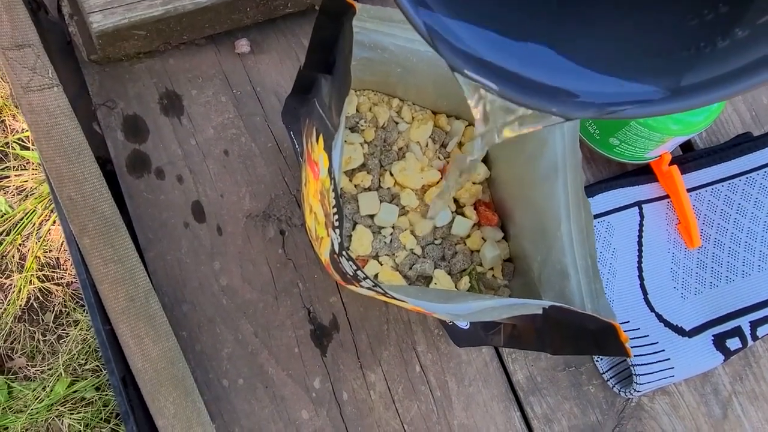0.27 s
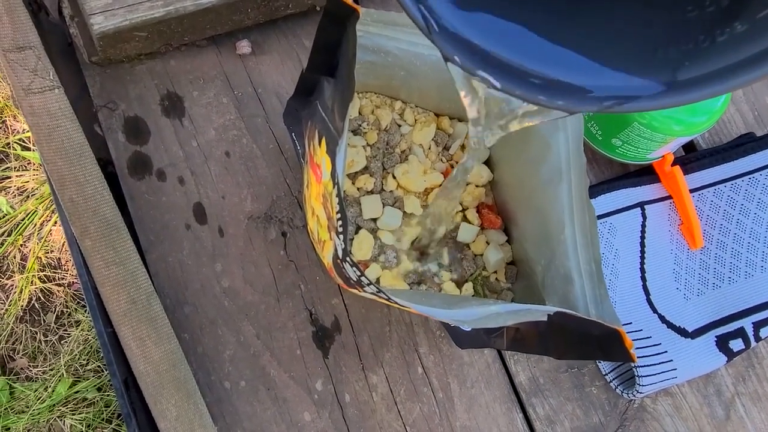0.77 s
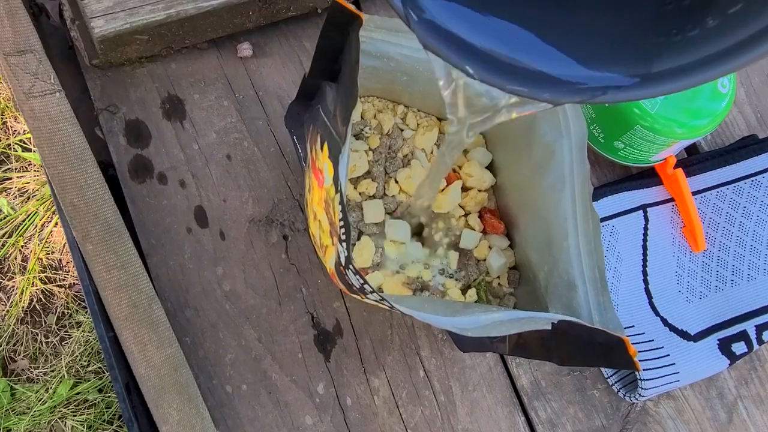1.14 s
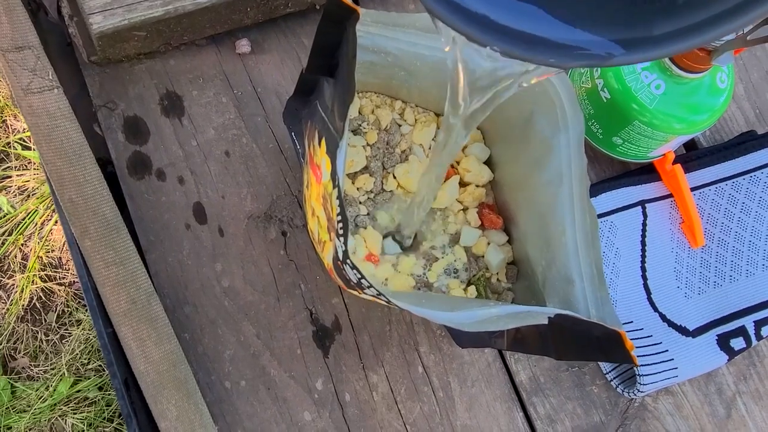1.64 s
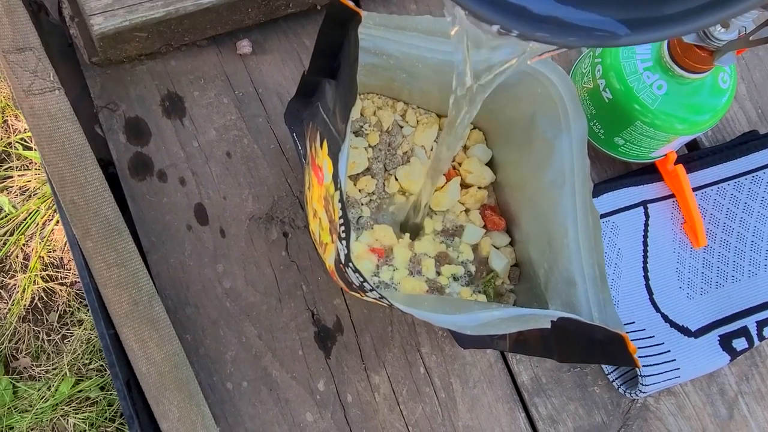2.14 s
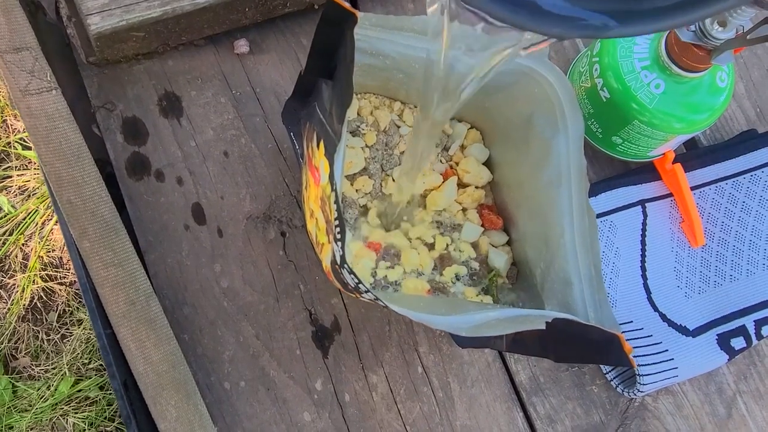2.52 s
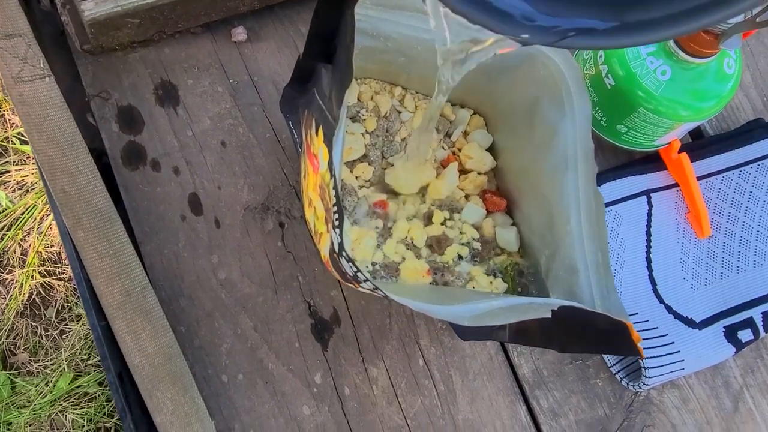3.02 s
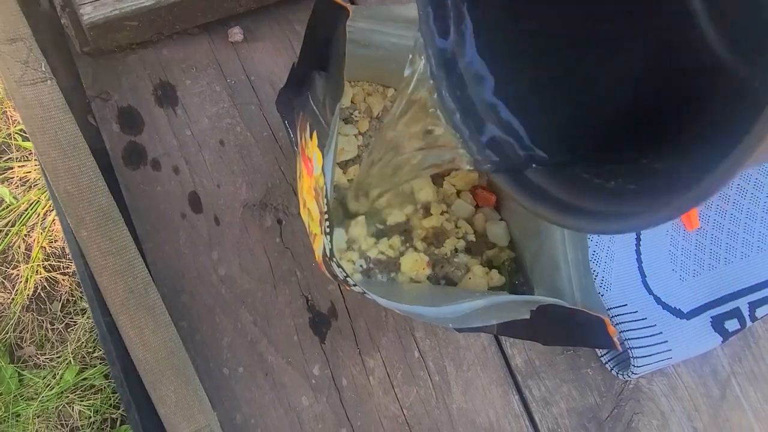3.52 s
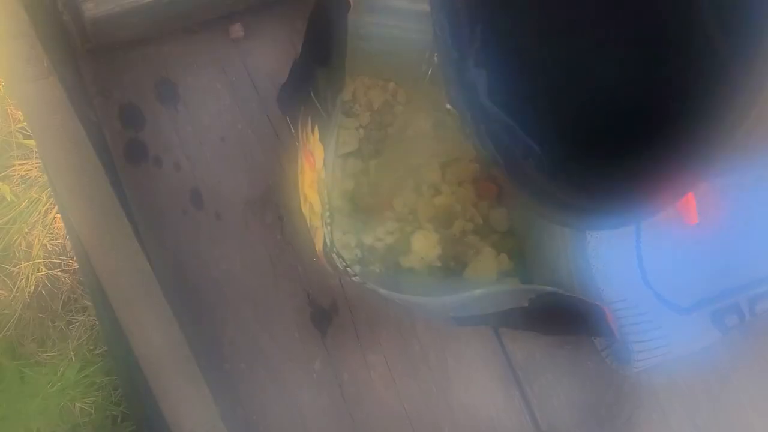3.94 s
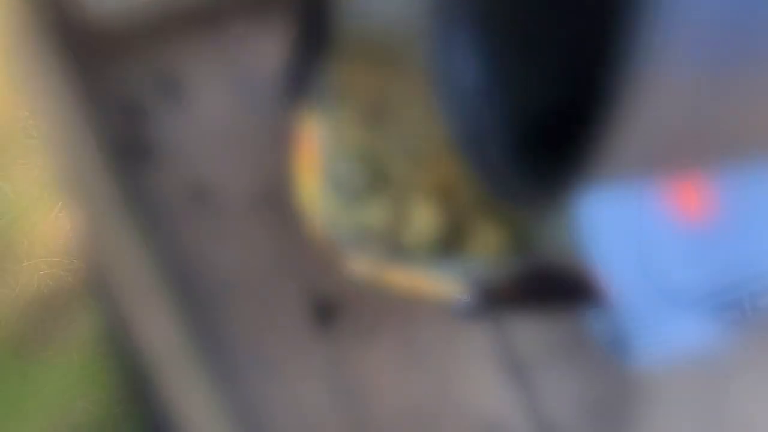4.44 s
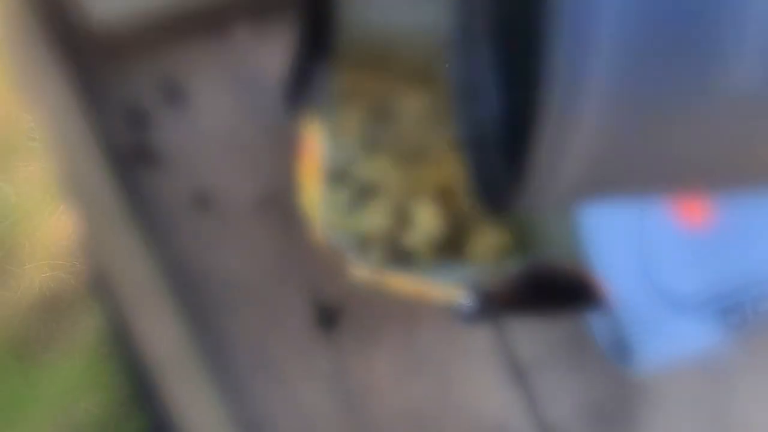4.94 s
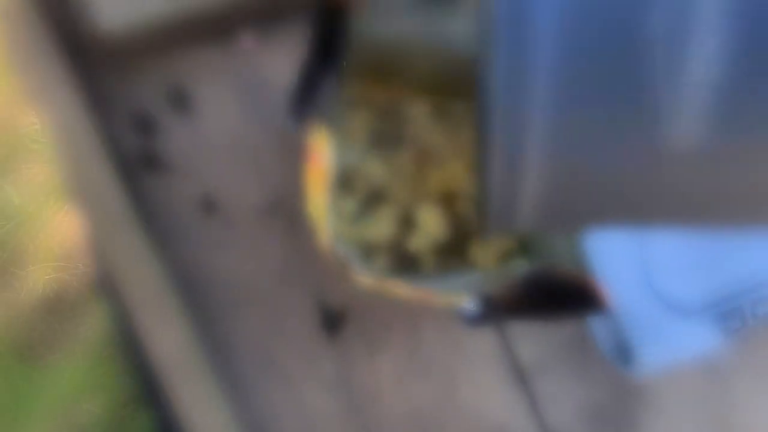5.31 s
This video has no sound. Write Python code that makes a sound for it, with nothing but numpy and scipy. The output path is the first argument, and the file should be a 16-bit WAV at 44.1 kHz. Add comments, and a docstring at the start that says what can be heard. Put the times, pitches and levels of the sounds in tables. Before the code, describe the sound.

Close, dry stereo outdoors on a wooden deck, with gusty deep rumble, faint air and a hollow, slowly sinking drone throughout. A soft low bloop comes first; at about 0.2 s water reaches the hot pot rim and a thin, bright sizzle starts. From 0.5 s separate wet splats and pattering land on dried food, with sharp metallic spits, densest between 0.7 and 1.3 s. The sizzle turns from coarse crackle to finer fizz as the pot tips, while round low bloops cluster around 1.5-1.9 s. Through 2-3 s the rustling becomes wetter and fuller, with small bubbles and drops tapping foil. Around 3.3-3.6 s a surge and a rising swish slide along the pouch. Sharp, damped foil snaps erupt at 3.7-4.0 s, strongest near 3.8, with small ones until 4.2. The pour then thins; from 4.95 s quick, nearly even drips patter to the end over light fizz.

```python
"""Boiling water is poured from a camp pot into a foil pouch of dried food: filtered clicks and ringing bubbles.
It spatters and rustles over the food, with separate splats, drops on the foil and a rising swish.
The hot pot wall sizzles and spits: clicks coloured by its ring, which shifts as the pot tips.
The pouch crackles in sharp damped snaps; low bloops come and go.
Behind it, on a wooden deck outdoors: a low rumble with gusts, faint air and a sinking hollow drone."""
import sys
import numpy as np
from scipy import signal
from scipy.fft import rfft, irfft
from scipy.io import wavfile
from scipy.ndimage import uniform_filter1d

SR = 44100
rng = np.random.default_rng(int(sys.argv[2]) if len(sys.argv) > 2 else 0)


def to_wav(sig):
    """Store sig (one row per channel, or 1-D mono) as 16-bit WAV at the path in sys.argv[1].

    Samples outside -1..1 are clipped; the rate is SR.
    """
    pcm = np.clip(np.atleast_2d(sig), -1, 1) * 32767
    pcm = np.round(pcm).astype(np.int16)
    wavfile.write(sys.argv[1], SR, pcm.T)  # frames by channels


N = 245416
TIME = np.arange(N) / SR
FREQ = np.fft.rfftfreq(N, 1 / SR)
FIRST_DROP_S = 0.225  # the water reaches the hot rim

# Colour of water landing on the food. Each row: frequency in Hz, relative level in dB.
SPLASH_SPECTRUM = [(400, -28.5), (650, 2), (780, -29), (880, 7.5), (1120, 5.5), (1420, -4), (1850, -1.5),
                   (2100, -50), (2350, -23), (2650, -13), (5000, -16.5), (9000, -26)]


def amp(db):
    """Decibels to gain."""
    return 10 ** (np.asarray(db) / 20)


def unit(x):
    """Scales to an rms of one."""
    return x / np.sqrt(np.mean(x ** 2) + 1e-20)


def curves(table):
    """Each column of a table over time."""
    s, *columns = np.transpose(table)
    return [np.interp(TIME, s, c) for c in columns]


def spectra(table, hz):
    """Each column of a table over log frequency."""
    f, *columns = np.transpose(table)
    return [np.interp(np.log(hz + 1), np.log(f + 1), c) for c in columns]


def swells(table):
    """Rise in dB over time: one smooth hump for each row."""
    rise_db = 0
    for s, length_s, db in table:
        phase = np.pi * np.clip((TIME - s) / length_s, -.5, .5)
        rise_db = rise_db + db * np.cos(phase) ** 2
    return rise_db


def add(mix, s, sound):
    """Mixes a sound in at time s."""
    part = mix[:, max(round(s * SR), 0):][:, :sound.shape[1]]
    part += sound[:, :part.shape[1]]


def colour(x, spectrum, size=4096):
    """Causal minimum-phase filter: a click rings after its onset, never before."""
    log_gain = np.log(amp(spectra(spectrum, abs(np.fft.fftfreq(size, 1 / SR)))[0]))
    ring = np.fft.ifft(np.exp(np.conj(signal.hilbert(log_gain)))).real
    return signal.fftconvolve(x, ring[None, :size // 2], axes=1)[:, :x.shape[1]]


def noise(spectrum):
    """Two unrelated noises of one colour."""
    gain = amp(spectra(spectrum, FREQ)[0])
    return unit(irfft(rfft(rng.standard_normal((2, N))) * gain, N))


def band(x, low_hz, high_hz):
    """The part of a sound between two frequencies."""
    low_cut = 1 + (low_hz / (FREQ + 1)) ** 24
    high_cut = 1 + (FREQ / high_hz) ** 24
    return irfft(rfft(x) / low_cut / high_cut, N)


def steady(x, window_s):
    """Evens out swells slower than the window."""
    power = abs(uniform_filter1d(x ** 2, int(window_s * SR), axis=1))
    return x / np.sqrt(power + 1e-9)


def resonate(x, hz, width_hz):
    """A resonance that follows the curve hz."""
    turn = np.exp(2j * np.pi * np.cumsum(hz) / SR)
    r = np.exp(-np.pi * width_hz / SR)
    return 2 * (turn * signal.lfilter([1 - r], [1, -r], x / turn)).real


def grains(per_s, spread_db, clump_db, clump_s):
    """Clumped tiny clicks of uneven size; the second row has the same clicks with independent signs."""
    clumps = unit(uniform_filter1d(rng.standard_normal(N), max(int(clump_s * SR), 1)))
    size_db = spread_db * np.minimum(rng.exponential(1, N), 4) + clump_db * np.minimum(clumps, 2)
    births = rng.random(N) < per_s / SR
    return unit(amp(size_db) * births * rng.choice([-1, 1], (2, N)))


def bubbles(low_hz, high_hz, per_s, cycles, spread_db, count=24, size=2048):
    """Bubbles of mixed sizes: each rings for a few cycles at its own pitch and rises a little."""
    out, t = np.zeros((2, N)), np.arange(size) / SR
    for hz in np.geomspace(low_hz, high_hz, count):
        ring = np.sin(2 * np.pi * hz * t * (1 + 3 * t)) * np.exp(-t * hz / cycles)
        sizes = amp(spread_db * np.minimum(rng.exponential(1, N), 3))
        births = (rng.random(N) < per_s / count / SR) * sizes * rng.choice([-1, 1], (2, N))
        out += signal.oaconvolve(births, ring[None], axes=1)[:, :N]
    return unit(out)


def mottle(x, patchy_db, width_hz, length_s):
    """Every cluster of bubbles has its own pitches: short random spectral patches stand out or drop away."""
    z = signal.stft(x, nperseg=512, noverlap=384)[2]
    field = rng.standard_normal(z.shape[:0:-1])  # frames by bins
    for axis, span in enumerate([length_s * SR / 128, width_hz * 512 / SR]):
        kernel = np.exp(-(2 * np.arange(-16, 17) / span) ** 2)
        field = signal.fftconvolve(field, np.expand_dims(kernel, 1 - axis), "same")
    gain = unit(amp(patchy_db * np.minimum(unit(field), 2)))
    return signal.istft(z * gain.T, nperseg=512, noverlap=384)[1][:, :N]


def scatter(x, wet_db, decay_s, size=4096):
    """Dense little reflections between pot, pouch and deck: a decaying noise tail."""
    t = np.arange(size) / SR
    tail = rng.standard_normal((2, size)) * np.exp(-t / decay_s) * (t > .0007)
    return x + amp(wet_db) * signal.fftconvolve(x, tail / np.linalg.norm(tail[0]), axes=1)[:, :N]


def ports(x):
    """Turns a common and an unrelated row into left and right, keeping the spectrum of their mean."""
    # Two microphone ports. Each row: frequency in Hz, likeness 0-1, left-right in dB, left lead in radians.
    port_rows = [(29.7, 0.96, 11, 0.5), (79.5, 1, 4, 0.5), (152, 0.97, 2.5, 0.5), (357, 0.9, 1, 0.49),
                 (646, 0.99, 1, 0.94), (1110, 0.7, 4.5, 0.92), (1660, 1, 2, 1.5), (2650, 0.36, 0, 1.8),
                 (3280, 0.55, 3.5, 4), (5230, 0.8, 3.5, 4.5), (6400, 0.47, 5, 6), (6760, 0.53, 9.5, 5.5),
                 (8700, 0.92, 0.5, 5.5), (12300, 0.77, 0.5, 6.5), (15700, 0.76, 4, 7.5)]
    same, balance_db, lead = spectra(port_rows, FREQ)
    same = np.clip(same, 0, .995)
    left, right = amp(balance_db / 2), amp(-balance_db / 2)
    common, other = rfft(x)
    right_mix = same * common + np.sqrt(1 - same ** 2) * other
    pair = np.array([left * common, right * np.exp(-1j * lead) * right_mix])
    mean_gain = np.sqrt(left ** 2 + right ** 2 + 2 * same * np.cos(lead))
    return irfft(2 * pair / mean_gain, N)


def stages():
    """Weights of the three pot positions over time; their powers sum to one."""
    # Pot tip. Each row: time in seconds, stage (0 upright, 1 tilted, 2 tipped over the pouch).
    tip_rows = [(1.3, 0.1), (1.4, 1.11), (3.02, 1.19), (3.3, 2.2)]
    tip = np.clip(curves(tip_rows)[0], 0, 2)
    return np.sqrt(np.maximum(1 - abs(tip - np.array([[0], [1], [2]])), 0))


def flowing():
    """Fades from nothing to one as the first water arrives."""
    return np.clip((TIME - FIRST_DROP_S) / 0.033, 0, 1)


def background():
    """Deep outdoor rumble with gusts, faint air, and a hollow drone of noise and a sinking resonance."""
    # Spectra. Each row: frequency in Hz, relative level in dB.
    rumble_spectrum = [(8, -59), (18, -4.5), (26, -2.5), (33, 1.5), (42, 5.5), (53, -5), (68, -11),
                       (110, -16), (138, -27.5), (200, -34), (350, -37), (800, -70), (4000, -100)]
    air_spectrum = [(300, 6), (700, 0), (880, -7), (1100, -6.5), (1600, -8.5), (2250, -16), (3000, -17),
                    (6000, -44), (8050, -73), (11200, -29), (16000, -22)]
    open_spectrum = [(120, -7.5), (200, -23), (245, -3.5), (295, 3), (345, -7.5), (405, 2.5), (470, -9.5),
                     (560, -22.5), (720, -35.5), (2000, -40), (7000, -48)]
    covered_spectrum = [(120, -41), (195, -8), (245, 5), (305, -4), (360, -12), (430, -12), (520, -31),
                        (720, -22), (2000, -88)]  # the pot covers the pouch
    # Drone level. Each row: time in seconds, level in dB.
    drone_level = [(0, -37), (.3, -46), (.95, -41), (1.3, -43), (1.55, -34.5), (1.85, -35.5), (2.05, -40.5),
                   (2.7, -43), (3.0, -41), (3.45, -38.5), (3.7, -39.5), (4.45, -39), (4.7, -37.5),
                   (5.08, -43.5), (5.3, -38)]
    # Gusts lifting the rumble. Each row: top in seconds, length in seconds, rise in dB.
    gusts = [(.67, 0.28, 5.5), (.95, 0.1, 4.5), (1.53, 0.25, 5), (1.82, 0.059, 11), (2.66, 0.12, 6.5),
             (3.24, 0.25, 8), (3.42, 0.14, 5.5), (4.61, 0.1, 6.5), (4.95, 0.36, 7.5), (5.27, 0.16, 6.5)]
    start_hz, end_hz, sink_s = 341, 284.3, 2.67
    rumble_db, freshen_db_per_s = -31.5, 0.76  # the breeze between gusts freshens slowly

    centre_hz = end_hz + (start_hz - end_hz) * np.exp(-TIME / sink_s)
    upright, tilted, covered = stages()
    broad = np.hypot(upright, tilted) * noise(open_spectrum) + covered * noise(covered_spectrum)
    hum = resonate(rng.standard_normal((2, N)), centre_hz, width_hz=85)
    hum = resonate(hum, centre_hz, width_hz=75)
    drone = steady(broad + .5 * unit(hum), 0.12) * amp(curves(drone_level)[0])
    level_db = rumble_db + freshen_db_per_s * TIME + swells(gusts)
    rumble = steady(noise(rumble_spectrum), 0.131) * amp(level_db)
    return rumble + drone + noise(air_spectrum) * amp(-55.5)


def bloops():
    """Brief round tones that swell and fade, gliding slightly upward."""
    # Each row: centre in seconds, level in dB, pitch in Hz, length in seconds.
    bloop_rows = [(0.08, -36.5, 372, 0.11), (0.253, -45, 756, 0.048), (0.978, -32.5, 386, 0.054),
                  (1.25, -40.5, 492, 0.054), (1.463, -31.5, 272, 0.093), (1.557, -26.5, 304, 0.06),
                  (1.66, -30.5, 287, 0.11), (1.761, -31, 293, 0.081), (1.852, -32.5, 303, 0.12),
                  (3.002, -32.5, 300, 0.055), (3.412, -28.5, 254, 0.057), (3.239, -34, 495, 0.016),
                  (3.524, -31.5, 580, 0.014), (3.546, -41, 627, .04), (3.621, -44, 550, .05),
                  (4.672, -34.5, 279, 0.074), (5.536, -41.5, 600, .03)]
    out = np.zeros((2, N))
    for s, db, hz, length_s in bloop_rows:
        t = np.arange(-length_s / 2, length_s / 2, 1 / SR)
        tone = amp(db) * np.hanning(len(t)) * np.sin(2 * np.pi * hz * t * (1 + 0.49 * t))
        add(out, s + t[0], np.array([tone, 0 * tone]))
    return out


def ringing_tail(x, size=4096):
    """A short ringing tail after each snap: a sum of decaying tones."""
    # Tail tones. Each row: frequency in Hz, relative level in dB, 60 dB decay time in seconds.
    tail_tones = [(1055, -3, .05), (1240, -3, .06), (1615, 0, .045), (1775, -3, .05), (2040, -2, .04),
                  (2132, -1, .04), (2240, -3, .04), (2500, -9, .055), (2640, -9, .055), (3198, -2, .056),
                  (3590, -1, .06)]
    t = np.arange(size) / SR
    ring = 0
    for hz, db, t60_s in tail_tones:
        ring = ring + amp(db - 60 * t / t60_s) * np.sin(2 * np.pi * (hz * t + rng.random()))
    ring = ring * (1 - np.exp(-t / .002))
    return signal.oaconvolve(x, ring[None] / np.linalg.norm(ring), axes=1)[:, :N] * amp(-18.5)


def crinkles(size=2048):
    """A foil crease flips with a damped snap amid a noise burst and ragged ticks of smaller creases."""
    # Each row: time in seconds, level in dB, pitch in Hz, share of crackle 0-1, ring time constant in seconds.
    crease_rows = [(3.6702, -25, 1100, .3, .0012), (3.7125, -12, 3800, .3, .0004),
                   (3.7138, -18, 2750, .35, .0009), (3.7555, -21.5, 1300, .35, .002),
                   (3.777, -29, 1700, .7, .0006), (3.7905, -27, 2400, .7, .0005),
                   (3.7934, -16.5, 1650, .3, .001), (3.798, -19, 1900, .7, .0006),
                   (3.811, -10, 1550, .36, .0005), (3.8118, -17, 5800, .4, .0004),
                   (3.8189, -4.7, 1950, .1, .00042), (3.8212, -18, 2150, .3, .0008),
                   (3.8272, -16, 1300, .55, .001), (3.8318, -20, 2000, .8, .0006),
                   (3.836, -24, 2000, .7, .0006), (3.851, -25, 2400, .7, .0006),
                   (3.8592, -25, 2600, .6, .0008), (3.927, -31, 1500, .6, .0008),
                   (3.9485, -28, 3000, .8, .0005), (3.9517, -25, 2500, .8, .0006),
                   (3.9551, -15.5, 1720, .25, .0013), (3.9567, -17, 3600, .25, .0009),
                   (3.9616, -16, 2450, .3, .0009), (3.963, -19.5, 4000, .25, .001),
                   (3.978, -28, 2400, .8, .0006), (4.12, -34, 1600, .5, .002),
                   (4.1245, -25, 1640, .33, .0024), (4.1315, -33, 1500, .5, .0015),
                   (4.1452, -26, 4200, .6, .0004), (4.201, -33, 1700, .5, .0008)]
    # Crackle colour. Each row: frequency in Hz, relative level in dB.
    snap_spectrum = [(200, -38), (600, 4), (800, -22), (1000, 2.5), (1250, 5.5), (1450, -10), (1650, 5),
                     (2100, -1), (2450, -14), (2700, -3.5), (3700, 0), (5200, -12.5), (6600, -7),
                     (8000, -24), (11000, -16), (16000, -27)]
    out, t = np.zeros((2, N)), np.arange(size) / SR - .008
    late = np.maximum(t - np.array([[0], [.00007]]), 0)  # the right port is a little farther away
    flip = np.minimum(np.exp(t / .0007), np.exp(-t / .0022))
    strain = np.minimum(np.exp(t / .004), np.exp(-t / .011))
    for s, db, hz, crackle, ring_s in crease_rows:
        snap = np.sin(2 * np.pi * hz * late) * (1 - np.exp(-late / .0002)) * np.exp(-late / ring_s)
        creases = colour(rng.standard_normal((2, size)) * flip, snap_spectrum)
        ticks = rng.standard_normal((2, size)) * (rng.random(size) < 900 / SR)
        trail = colour(ticks * strain, snap_spectrum)
        blend = (1 - crackle) * snap / abs(snap).max() + 1.5 * crackle * creases / abs(creases).max()
        add(out, s + t[0], amp(db) * (blend + .4 * np.sqrt(crackle) * trail / abs(trail).max()))
    # the low body is 4 dB stronger on the left
    lean = amp(4 * np.array([[.5], [-.5]])) - 1
    out = out + band(out, 100, 2000) * lean
    return scatter(out, wet_db=-17, decay_s=.009) + ringing_tail(out)


def pot_wall(clicks):
    """Colours clicks by the pot wall, whose ring shifts as it is tipped."""
    # Each row: frequency in Hz, relative level in dB when upright, tilted, tipped.
    wall_spectra = [(890, -55, -64, -52), (2490, -38, -8, -16), (3900, -17, -19, -12),
                    (4400, -34, -17, -11), (4720, -7, -15, -8.5), (5200, -20.5, -15, -14.5),
                    (6200, -20.5, 0, -7.5), (6500, 0.5, -4, -4.5), (7630, -9, -10, -22),
                    (7980, -19, -9.5, -17.5), (9470, -6, -1.5, -9.5), (9930, 2.5, 5, -8), (11180, -4, 6, 0),
                    (11900, 1, 3, -5), (12860, -11, -5, -9), (16200, -14, -7.5, -16.5)]
    hz, *columns = np.transpose(wall_spectra)
    rung = [colour(clicks, np.column_stack([hz, db])) for db in columns]
    blend = sum(weight * unit(x) for weight, x in zip(stages(), rung))
    return blend * np.sqrt(np.mean(clicks ** 2))


def sizzle():
    """Steam bubbles burst on the pot wall: coarse crackle while upright, then finer fizz, pings throughout."""
    # Each row: time in seconds, level in dB.
    sizzle_level = [(0.25, -51), (0.6, -51), (0.8, -47.5), (0.97, -47), (1.25, -41.5), (1.45, -50),
                    (2.7, -50), (3.05, -45.5), (3.3, -49.5), (3.8, -45.5), (4.25, -49.5), (5.56, -48.5)]
    spurt_db, spurt_s = 1.5, 0.034  # the sizzle comes in uneven spurts
    upright, tilted, tipped = stages()
    coarse = grains(per_s=2500, spread_db=3.5, clump_db=4.5, clump_s=0.007)
    fine = grains(per_s=6000, spread_db=4.0, clump_db=2.2, clump_s=0.005)
    pings = bubbles(low_hz=5636, high_hz=13160, per_s=900, cycles=11, spread_db=7.0, count=16)
    fizz = pot_wall(upright * coarse + np.hypot(tilted, tipped) * fine + .33 * pings)
    fizz = scatter(fizz, wet_db=-17, decay_s=.007)
    spurts = uniform_filter1d(rng.standard_normal(N), int(spurt_s * SR))
    spurts = unit(uniform_filter1d(spurts, int(spurt_s * SR / 2)))
    return steady(fizz, 0.2) * amp(curves(sizzle_level)[0] + spurt_db * spurts) * flowing()


def spits(size=512):
    """Drops burst on the hot pot: each is one sharp tick inside a short spray."""
    # Each row: time in seconds, strength in dB ahead of the wall's colouring.
    spit_rows = [(0.284, -17.5), (0.303, -17.5), (0.321, -21.5), (0.3616, -20), (0.465, -23), (0.538, -18),
                 (0.554, -13.5), (0.628, -19), (0.7166, -11), (0.7367, -15), (0.757, -21), (0.791, -13.5),
                 (.812, -16), (.834, -9.5), (0.92, -20), (1.046, -13), (1.066, -16), (1.08, -11),
                 (1.1194, -22.5), (1.1555, -13), (1.167, -10), (1.236, -17.5), (1.2918, -12.5),
                 (1.2985, -14), (1.423, -21), (1.5467, -19), (1.646, -15.5), (1.7784, -22), (1.905, -21),
                 (1.961, -17), (2.098, -24), (2.1793, -12), (2.238, -25), (2.331, -20), (2.3742, -15),
                 (2.3844, -14), (2.408, -15), (2.913, -26), (2.9319, -25), (2.993, -19), (3.051, -18),
                 (3.1423, -16), (3.24, -15), (3.3053, -14.5), (3.4723, -19), (3.521, -20), (3.714, -11.5),
                 (3.813, -29), (3.829, -9.5), (3.97, -14.5), (4.127, -15.5), (4.383, -13), (4.691, -17),
                 (4.94, -14), (5.048, -20)]
    rise_s, fall_s = .0002, .0021
    spray_share = .55  # of the energy
    out, t = np.zeros((2, N)), np.arange(size) / SR - .001
    envelope = np.exp(-t / fall_s) * np.minimum(np.exp(t / rise_s), 1)
    tick = np.sqrt(1 - spray_share)
    for s, db in spit_rows:
        spray = rng.standard_normal((2, size)) * envelope
        burst = np.sqrt(spray_share) * spray / np.linalg.norm(spray[0])
        burst[0, np.argmin(abs(t))] += tick
        # the second row's tick comes a random fraction of a millisecond later, which widens it
        burst[1, np.argmin(abs(t - rng.uniform(.0002, .0007)))] += tick
        add(out, s + t[0], amp(db) * burst)
    return pot_wall(out)


def hot_pot():
    """Sizzle and spits at the two ports; while the pot is upright its rim rings towards the left."""
    pair = ports(mottle(sizzle(), patchy_db=2.6, width_hz=550, length_s=.014) + spits())
    rim = band(pair, low_hz=6450, high_hz=7900) * stages()[0] * 0.66
    return pair + rim * np.array([[.5], [-1]])


def swish():
    """The stream slides along the foil: fine spray through a resonance that mostly rises."""
    # Each row: time in seconds, level in dB, pitch in Hz.
    swish_rows = [(3.31, -63, 3270), (3.37, -49, 3350), (3.44, -58, 3600), (3.49, -47, 3850),
                  (3.55, -61, 3770), (3.61, -55, 3750)]
    width_hz = 1050  # of each of two passes
    db, hz = curves(swish_rows)
    spray = grains(per_s=3000, spread_db=2.5, clump_db=1.5, clump_s=.005)
    sliding = (TIME > swish_rows[0][0]) & (TIME < swish_rows[-1][0])
    return unit(resonate(resonate(spray, hz, width_hz), hz, width_hz)) * amp(db) * sliding


def drop(spectrum, size=512):
    """One drop on the foil: a burst that decays over a few milliseconds, first row with a peak of one."""
    t = np.arange(size) / SR
    tick = colour(rng.standard_normal((2, size)) * np.exp(-t / .0026), spectrum, size=1024)
    return tick / abs(tick[0]).max()


def taps(count=48):
    """Stray drops hit the pouch wall; at the end the thinning stream breaks into a string of drops."""
    # Stray drops. Each row: time in seconds, level in dB.
    tap_rows = [(1.457, -32), (1.466, -31), (1.556, -32.5), (1.924, -33), (1.943, -33.5), (2.435, -34),
                (2.448, -34), (2.680, -36), (2.761, -35), (2.843, -45), (2.899, -42), (2.933, -30),
                (2.96, -35), (3.012, -36), (3.062, -37), (3.095, -45), (3.372, -51), (3.398, -36),
                (3.482, -27), (3.523, -24), (4.063, -26.5), (4.357, -37), (4.556, -37), (4.592, -48),
                (4.733, -37.5), (4.743, -32), (5.041, -35), (5.068, -45)]
    # Ring of the foil wall and colour of the string. Each row: frequency in Hz, relative level in dB.
    foil_spectrum = [(900, -6), (2200, -16), (2900, -23), (3900, -0.5), (5000, -9), (6400, 3), (7900, -20),
                     (11000, 0.5), (16000, -23)]
    dribble_spectrum = [(1000, -34), (3000, -20), (4200, -7), (5200, -7), (6300, 3), (7600, -16),
                        (11000, -6), (16000, -25)]
    start_s, drops_per_s, jitter_drops = 4.95, 54, 0.12  # quick, nearly even
    dribble_db, spread_db = -38.5, 2
    out = np.zeros((2, N))
    for s, db in tap_rows:
        add(out, s - .001, amp(db) * drop(foil_spectrum))
    early, strength = rng.standard_normal((count, 2)).T
    times_s = start_s + (np.arange(count) + jitter_drops * early) / drops_per_s
    for s, db in zip(times_s, dribble_db + spread_db * strength):
        add(out, s, amp(db) * drop(dribble_spectrum))
    return out


def splats(size=2048):
    """A lump of water spatters, slaps the food with a short pop, and traps a bubble that rings on, rising."""
    # Each row: time in seconds, level in dB, pitch in Hz.
    splat_rows = [(.519, -35.5, 1125), (0.536, -37, 1230), (0.6864, -29, 930), (0.7047, -28, 1020),
                  (0.791, -35, 1150), (0.825, -31.5, 1070), (.834, -37, 1170), (0.995, -34, 1190),
                  (1.015, -34, 1040), (1.0654, -27.5, 1030), (1.081, -36, 1190), (1.121, -30.5, 990),
                  (1.131, -33, 990), (1.1684, -24, 1300), (1.181, -33.5, 1520), (1.2388, -33, 1140),
                  (1.256, -37, 1670), (1.312, -37, 1100), (1.4554, -33.5, 990), (1.634, -37, 1220),
                  (1.697, -33.5, 990), (1.82, -28.5, 1050), (1.915, -38, 1100), (1.923, -34, 1260),
                  (1.954, -44, 1210), (2.18, -36, 1280), (2.226, -34.5, 1400), (2.246, -40, 1320),
                  (2.288, -37, 1090), (2.327, -29.5, 1150), (2.377, -34.5, 1390), (2.41, -33, 1040),
                  (2.4624, -29.5, 1000), (2.536, -31, 1390), (2.5555, -33, 1210), (2.68, -29, 1260),
                  (2.702, -38, 1040), (2.76, -35, 1080), (2.799, -39, 1150), (2.825, -34, 1100),
                  (2.849, -30, 1040), (2.927, -36, 1200), (2.955, -26, 1210), (2.960, -29.5, 1100),
                  (3.014, -36, 1100), (3.090, -36.5, 1080), (3.1854, -37, 1130), (3.2385, -25, 970),
                  (3.259, -37, 1180), (3.3429, -33.5, 1080), (3.537, -32, 1280), (3.583, -35.5, 1110),
                  (3.657, -32, 1180)]
    plop_share, plop_cycles, plop_rise_per_s = .25, 7, 5
    out, t = np.zeros((2, N)), np.arange(size) / SR - .004
    after = np.maximum(t + .0007, 0)
    swell = np.minimum(np.exp(t / .0025), np.exp(-t / .0042))
    for s, db, hz in splat_rows:
        spatter = colour(rng.standard_normal((2, size)) * swell, SPLASH_SPECTRUM)
        turns = hz * t + np.array([[0], [rng.random()]])
        pop = np.sin(2 * np.pi * turns) * (1 - np.exp(-after / 0.00065)) * np.exp(-after / 0.00082)
        plop = np.sin(2 * np.pi * turns * (1 + plop_rise_per_s * after))
        plop = plop * (1 - np.exp(-after / 0.0015)) * np.exp(-after * hz / plop_cycles)
        splat = .9 * pop / abs(pop).max() + plop_share * plop + 0.7 * spatter / abs(spatter).max()
        add(out, s + t[0], amp(db) * splat)
    return out


def stream():
    """Water patters on the food, rustles through it and drums in the pouch; soaking and surges lift the sound."""
    # Landing stream and low drumming. Each row: time in seconds, level in dB.
    pour_level = [(.22, -65), (.45, -59.5), (.7, -55.5), (1.15, -54), (1.6, -54), (2.5, -51.5),
                  (3.1, -50.5), (3.4, -56), (4.1, -55.5), (5.56, -65)]
    drum_level = [(.2, -45.5), (.55, -58), (1.25, -41), (1.45, -47), (1.8, -39), (2.2, -46.5), (2.7, -40),
                  (3.05, -51), (3.4, -35.5), (3.8, -49.5), (4.3, -41.5), (4.8, -44), (5.25, -43),
                  (5.5, -45)]
    # Surges of water through the food. Each row: top in seconds, length in seconds, rise in dB.
    surges = [(.77, 0.23, 9), (1.15, 0.17, 12.5), (1.93, 0.04, 12.5), (2.42, 0.16, 15), (2.93, 0.41, 3),
              (3.24, 0.059, 12.5), (3.38, 0.21, 2), (3.5, 0.37, 11.5), (3.96, 0.13, 14)]
    # Spectra. Each row: frequency in Hz, relative level in dB.
    rustle_spectrum = [(1500, -10.5), (2250, -9), (2700, 3.5), (3000, -1), (3550, -2.5), (4100, -0.5),
                       (4700, -1), (5600, 0), (7200, 2), (8200, -24), (14000, -24)]
    hollow_spectrum = [(300, -5.5), (480, 0.5), (600, 2.5), (700, -5.5), (830, -15), (1100, -12),
                       (1700, -16.5), (2200, -21.5), (5000, -48)]
    drum_spectrum = [(70, -10), (125, -1), (180, 4.5), (225, -1), (280, -8), (500, -70), (4000, -85)]
    soak_s = 1.37  # time constant: the food gets wet and the pouch fills
    rustle_dry_db, rustle_wet_db = -69.5, -59
    hollow_dry_db, hollow_wet_db, hollow_surge_share = -61.5, -48.5, 0.28
    froth_db, glug_db = -1.5, -3.5  # relative to rustle and hollow wash
    droplets_db = -66.5  # at the strongest flow

    splash_db, drum_db, surge_db = curves(pour_level)[0], curves(drum_level)[0], swells(surges)
    flow = amp(splash_db - splash_db.max())
    soaked = 1 - np.exp(-np.maximum(TIME - FIRST_DROP_S, 0) / soak_s)
    rustle_db = rustle_dry_db + (rustle_wet_db - rustle_dry_db) * soaked + surge_db
    hollow_db = hollow_dry_db + (hollow_wet_db - hollow_dry_db) * soaked + hollow_surge_share * surge_db

    patter = colour(grains(per_s=450, spread_db=3.0, clump_db=4, clump_s=0.007), SPLASH_SPECTRUM)
    gurgle = bubbles(low_hz=880, high_hz=1880, per_s=130, cycles=5.5, spread_db=3.0, count=16)
    landing = (0.91 * steady(patter, 0.27) + 0.66 * gurgle) * amp(splash_db)

    # small bubbles froth in the soaking food
    rustle = colour(grains(per_s=650, spread_db=4.0, clump_db=3.0, clump_s=0.005), rustle_spectrum)
    froth = bubbles(low_hz=3210, high_hz=4140, per_s=330, cycles=6.4, spread_db=-3.0, count=8)
    rustle = unit(rustle) + amp(froth_db) * soaked * froth
    rustle = mottle(steady(rustle, 0.057), patchy_db=4.5, width_hz=300, length_s=.02)

    droplets = bubbles(low_hz=2650, high_hz=5600, per_s=60, cycles=12, spread_db=4.0, count=10)
    wet = landing + rustle * amp(rustle_db) + droplets * amp(droplets_db) * flow

    # large bubbles glug in the filling pouch
    glugs = bubbles(low_hz=480, high_hz=650, per_s=35, cycles=6, spread_db=2.0, count=6)
    wash = mottle(noise(hollow_spectrum), patchy_db=2.2, width_hz=200, length_s=.035)
    hollow = (wash + amp(glug_db) * glugs * flow) * amp(hollow_db) * flowing()
    drumming = steady(noise(drum_spectrum), 0.27) * amp(drum_db)
    return scatter(wet * flowing(), wet_db=-8, decay_s=0.007) + hollow + drumming


def scene():
    """All sources, close to the pair of ports."""
    at_ports = ports(background() + bloops() + swish() + taps() + splats() + stream())
    return at_ports + hot_pot() + crinkles()


def record(dry):
    """The band limit of the recorder, with a very short fade at start and end."""
    edge = signal.firwin(511, 16000, window=("kaiser", 9), fs=SR)
    return signal.oaconvolve(dry * signal.windows.tukey(N, .002), edge[None], "same")


dry = scene()
out = record(dry)
to_wav(out)
```